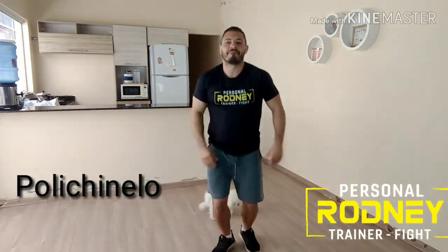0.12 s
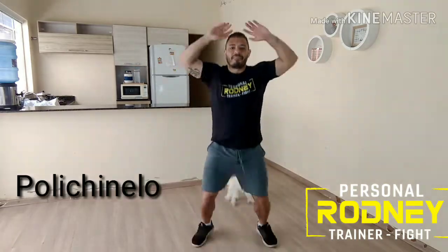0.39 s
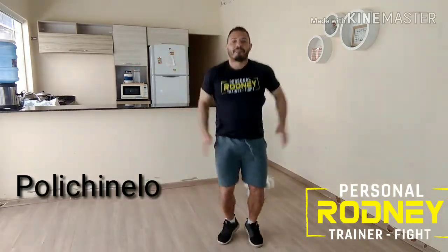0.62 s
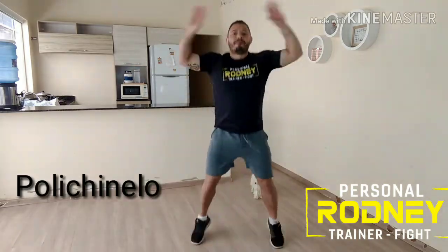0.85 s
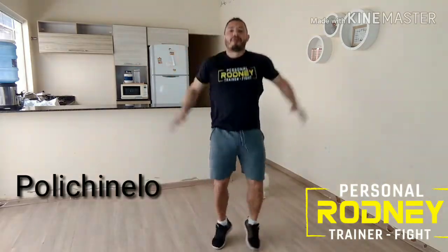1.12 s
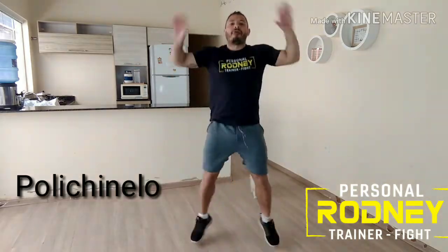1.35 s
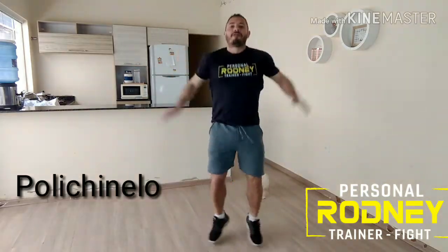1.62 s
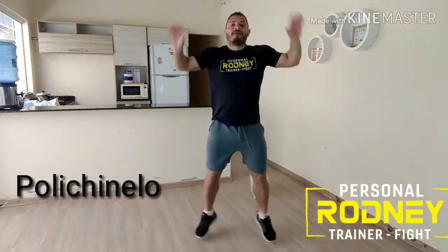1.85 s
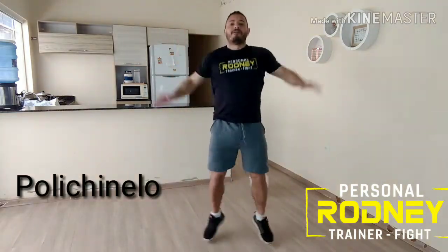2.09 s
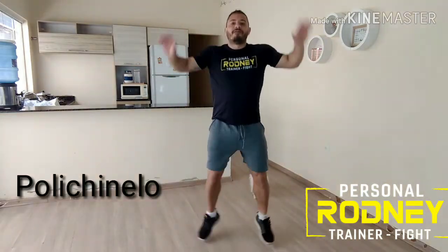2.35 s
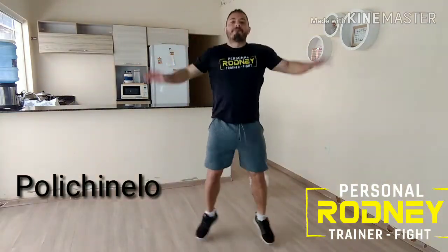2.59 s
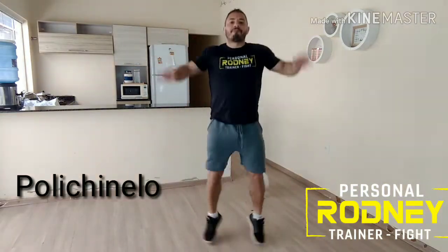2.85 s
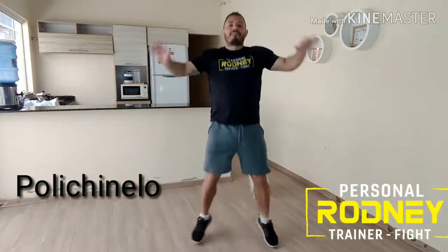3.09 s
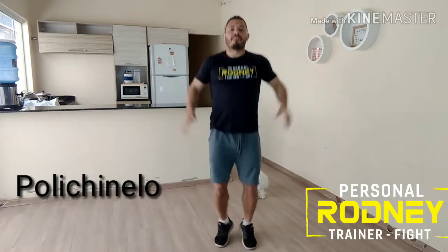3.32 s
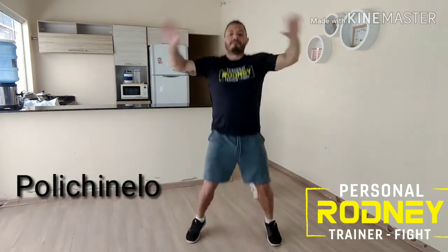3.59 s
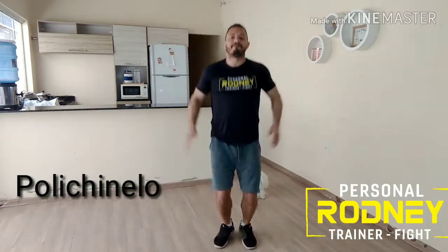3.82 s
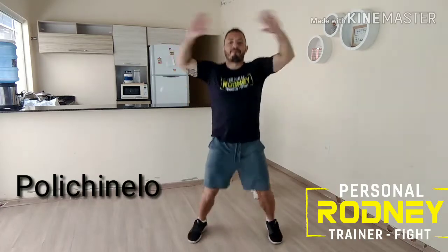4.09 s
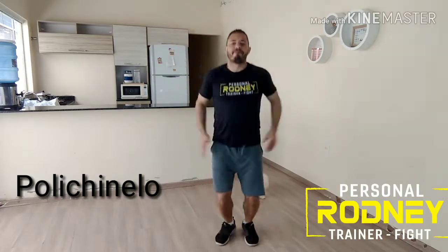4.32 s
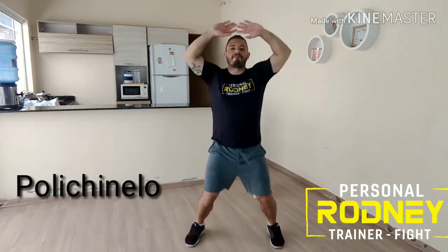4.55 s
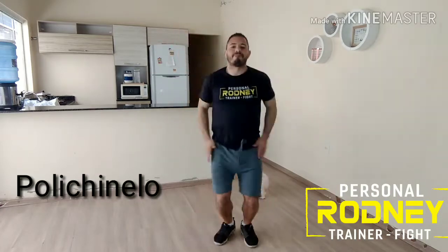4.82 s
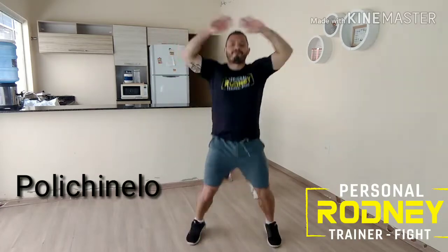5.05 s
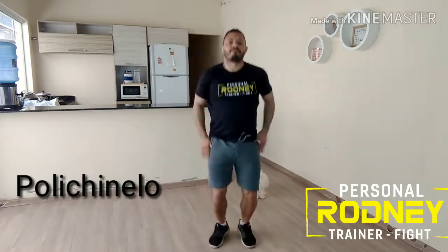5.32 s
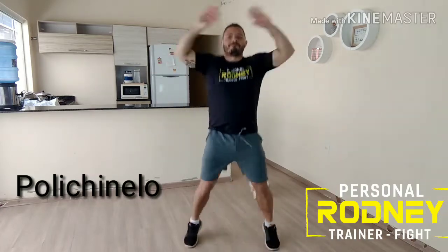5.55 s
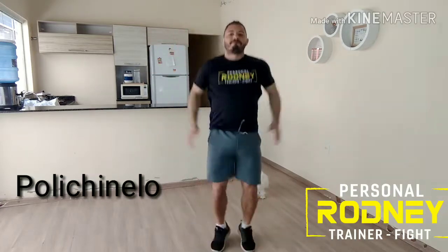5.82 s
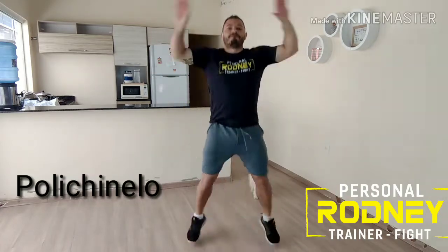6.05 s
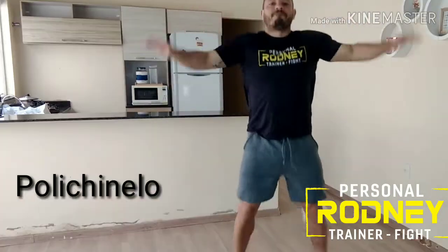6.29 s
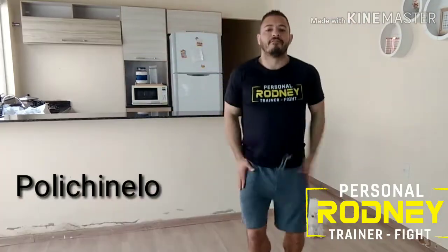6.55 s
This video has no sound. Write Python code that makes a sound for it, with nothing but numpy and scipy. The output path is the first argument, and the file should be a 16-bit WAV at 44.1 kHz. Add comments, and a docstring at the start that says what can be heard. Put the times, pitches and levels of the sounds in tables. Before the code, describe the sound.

Someone in sneakers does jumping jacks on a laminate floor in a bare, echoing room. The hollow thumps come about four a second, pitched up and shortened as if sped up, with soft pats and dry sole ticks between. Cloth hisses faintly over quiet room tone and a thin whine. At the end the speed drops to normal and several landings bunch into a loud, deeper clatter. Nearly mono, microphone a few metres away.

```python
"""Bare, lively room with a laminate floor: someone in sneakers does jumping jacks; an appliance whines faintly.
Landings are swelling, dying noise bands plus ringing floor modes; dry ticks, rubs and dull pats are
shorter noise bursts. Room tone and cloth hiss are shaped steady noise, the whine a sine. The middle stretch
is played back faster than life, so it sounds higher and shorter; Hz and t60 hold for that stretch."""
import sys
import numpy as np
from scipy import signal
from scipy.fft import rfft, irfft, next_fast_len
from scipy.io import wavfile
from scipy.ndimage import map_coordinates

SR = 44100
rng = np.random.default_rng(int(sys.argv[2]) if len(sys.argv) > 2 else 0)


def dump(signal):
    """Clip the signal to [-1, 1] and save it as 16-bit WAV at the path in sys.argv[1]."""
    limited = np.clip(np.atleast_2d(signal).T, -1, 1)
    pcm = np.round(limited * 32767).astype(np.int16)
    wavfile.write(sys.argv[1], SR, pcm)


def field_ratio(decibels):
    """Amplitude ratio for a level in dB (20 dB per decade); scalars and array-likes work."""
    return 10 ** (np.asarray(decibels, dtype=float) / 20)


N = 294102

SPEED, FAST_FROM_S, FAST_TO_S = 1.803, .101, 6.164
RATE = SR * SPEED   # scene samples per second of fast playback
BANDS_HZ = 45 * 2 ** np.arange(0, 9.3, .4)


def position(s):
    """Scene sample played at time s; the fast stretch advances SPEED times as quickly."""
    s = np.asarray(s, float)
    return SR * (s + (SPEED - 1) * np.clip(s - FAST_FROM_S, 0, FAST_TO_S - FAST_FROM_S))


LENGTH = next_fast_len(int(position(N / SR) + .45 * RATE))   # room for the last tail


def at_hz(points, hz, order=1):
    """Interpolates a table column over log frequency."""
    points = np.array(points)
    return np.interp(np.log(hz + 1), np.log(points[:, 0]), points[:, order])


def noise(spectrum):
    """Gaussian noise filtered to this spectrum, nominal rms 1."""
    shape = field_ratio(at_hz(spectrum, np.fft.rfftfreq(LENGTH, 1 / RATE)))
    shape = shape / np.sqrt(np.mean(shape ** 2))
    return irfft(rfft(rng.standard_normal(LENGTH)) * shape, LENGTH)


def band_pool(size):
    """Unrelated noise in overlapping bands, each of the same power per Hz."""
    octaves = np.log2(np.fft.rfftfreq(size, 1 / RATE) + 1)
    apart = np.clip((octaves - np.log2(BANDS_HZ)[:, None]) / .4, -1, 1)
    white = rng.standard_normal((len(BANDS_HZ), size))
    return irfft(rfft(white) * np.cos(apart * np.pi / 2), size)


# room decay: (frequency [Hz], t60 [s])
ROOM_DECAY = [(200, 0.33), (530, 0.4), (1400, 0.34), (3700, 0.39), (9700, 0.27), (20000, 0.55)]


def reverberant(times_s, level_db, band_db, rise_ms, direct_db, direct_ms):
    """Each blow swells, then dies in the room, band by band, with near sound on top."""
    size = int(.42 * RATE)
    pool, out = band_pool(2 ** 16), np.zeros(LENGTH + size)
    t = np.arange(size) / RATE
    decay = field_ratio(-60 * t / at_hz(ROOM_DECAY, BANDS_HZ)[:, None])
    envelope = decay * (1 - np.exp(-1000 * t / rise_ms)) ** 2
    starts = (rng.random(len(times_s)) * (pool.shape[1] - size)).astype(int)
    for at, level, db, ms, start in zip(position(times_s).astype(int), level_db, band_db, direct_ms, starts):
        gains = field_ratio(level + db) / np.sqrt(np.sum(field_ratio(2 * db) * BANDS_HZ) / RATE)
        direct = 1 + field_ratio(direct_db) * np.exp(-1000 * t / ms)
        out[at:at + size] += direct * (gains @ (pool[:, start:start + size] * envelope))
    return out[:LENGTH]


# room tone and cloth hiss over time: (time [s], room tone level [dB], swish level [dB])
STIR = [(0.0, -47, -45), (0.15, -52.5, -53), (0.72, -54, -62.5), (2.15, -54.5, -64.5), (2.75, -53.5, -59.5),
        (3.3, -54.5, -64.5), (3.881, -53.5, -59.5), (4.4, -55, -65), (4.87, -54, -59.5), (5.6, -54.5, -63),
        (5.92, -53.5, -62.5), (6.16, -55.5, -60), (6.3, -50, -53), (6.67, -38.5, -54)]
# room tone spectrum: (frequency [Hz], density [dB per Hz])
AIR = [(24, -61), (40, -12), (338, -2), (466, -4), (541, -8.5), (659, -4), (910, -7.5), (1230, -12.5),
       (3470, -21), (4030, -28), (5430, -24), (15000, -42)]
# cloth hiss spectrum: (frequency [Hz], density [dB per Hz])
SWISH = [(2500, -18), (5000, 1.5), (9000, 2.5), (15000, 2.5), (25000, 0)]
# cloth hisses as the limbs swing out of each landing
SWING_AFTER_S, SWING_WIDTH_S, SWING_DB = .16, 0.025, 1


def background():
    """Steady room tone, and the hiss of moving cloth in uneven random brushes."""
    n = np.arange(LENGTH)
    s, tone_db, swish_db = np.transpose(STIR)
    tone_db = np.interp(n, position(s), tone_db)
    swish_db = np.interp(n, position(s), swish_db)
    brush = np.interp(n * 52.0 / RATE, np.arange(999), rng.standard_normal(999))   # 52 knots/s
    knots = np.arange(0, LENGTH, 100)
    since_s = (knots - position(np.array(LANDINGS)[:, :1])) / RATE
    swing_db = SWING_DB * np.exp(-((since_s - SWING_AFTER_S) / SWING_WIDTH_S) ** 2).max(axis=0)
    swish_db = swish_db + np.interp(n, knots, swing_db) + 1.6 * brush
    return field_ratio(tone_db) * noise(AIR) + field_ratio(swish_db) * noise(SWISH)


WHINE_HZ, WHINE_RMS_DB = 1378.0, -63   # level ahead of the microphone


def whine():
    """Appliance: a thin steady sine."""
    return np.sqrt(2) * field_ratio(WHINE_RMS_DB) * np.sin(2 * np.pi * WHINE_HZ * np.arange(LENGTH) / RATE)


# soft pats, likely hands on thighs after feet-together landings, and flat-soled scuffs:
# (time [s], relative level [dB])
PATS = [(0.6603, -44), (1.2062, -37.5), (1.7132, -36), (2.2194, -39.5), (2.7472, -39), (3.78, -37),
        (4.309, -42.5), (4.417, -44.5), (4.8294, -51), (4.914, -46), (5.36, -51), (5.468, -39), (5.89, -50),
        (6.548, -19), (6.568, -16.5), (6.592, -25), (6.623, -32)]
# pat spectrum: (frequency [Hz], density [dB per Hz])
PAT_SPECTRUM = [(300, -22), (700, 6), (1500, -3.5), (2500, -6), (3500, -13.5), (6000, -17), (15000, -25)]


def pats():
    """Palm on cloth: a slow, dull slap without the floor's ring."""
    s, level_db = np.transpose(PATS)
    return reverberant(s - .0018, level_db - 7.5, [at_hz(PAT_SPECTRUM, BANDS_HZ)] * len(s),
                       rise_ms=1.7, direct_db=-10.0, direct_ms=np.full(len(s), 11.0))


# dry ticks as the soles leave the floor after feet-apart landings: (time [s], relative level [dB])
PUSH_OFFS = [(0.513, -32.5), (1.0364, -35), (1.3008, -45), (1.558, -34), (2.069, -35), (2.5743, -37.5),
             (3.0962, -36.5), (3.617, -35), (4.142, -36.5), (4.664, -36.5), (5.1908, -35.5), (5.719, -32),
             (6.2248, -28.5)]
PUSH_OFF_HZ, PUSH_OFF_BRIGHT_DB, PUSH_OFF_MS = 5840, -8, 1.5
# bright scrapes and rubs of sole or cloth:
# (time [s], relative level [dB], centre [Hz], length [ms])
RUBS = [(0.0809, -20.5, 9500, 4.4), (0.095, -23, 14520, 3.3), (.53, -42, 11000, 8), (2.745, -43, 5400, 62),
        (3.801, -47, 5500, 20), (5.639, -33, 12000, 1.5), (5.645, -32, 6800, 1.8),
        (6.5668, -23, 14600, 5.1)]
RUB_BRIGHT_DB = 3
# the sole ticks just after a landing, much louder for hard ones
SOLE_TICK_AFTER_S, SOLE_TICK_HZ, SOLE_TICK_BRIGHT_DB, SOLE_TICK_MS = .004, 5700, -5, 1.86
SOLE_TICK_DB, SOLE_TICK_DB_PER_DB, SOLE_TICK_TOP_DB, HARD_LANDING_DB = -33.5, 2.07, -18, -15.5


def tick_rows():
    """Time s, relative level dB, centre Hz, brightness dB and length ms of every tick and rub."""
    rows = []
    for s, db, first_db, *_ in LANDINGS:
        excess_db = db + max(first_db, 0) - HARD_LANDING_DB
        level_db = min(SOLE_TICK_TOP_DB, SOLE_TICK_DB + SOLE_TICK_DB_PER_DB * excess_db)
        rows.append((s + SOLE_TICK_AFTER_S, level_db, SOLE_TICK_HZ, SOLE_TICK_BRIGHT_DB, SOLE_TICK_MS))
    rows += [(s, db, PUSH_OFF_HZ, PUSH_OFF_BRIGHT_DB, PUSH_OFF_MS) for s, db in PUSH_OFFS]
    rows += [(s, db, hz, RUB_BRIGHT_DB, ms) for s, db, hz, ms in RUBS]
    return rows


# base tick spectrum: (frequency [Hz], density [dB per Hz])
TICK_SPECTRUM = [(1500, -31), (3500, -1), (6000, -13), (8000, -4.5), (11000, -5.5), (16000, -3.5),
                 (25000, -15)]


def ticks():
    """Short noise clicks around one pitch, with a weak room tail."""
    s, level_db, centre_hz, bright_db, length_ms = np.transpose(tick_rows())
    bump_db = 10.4 * np.exp(-(np.log2(BANDS_HZ / centre_hz[:, None]) / 0.44) ** 2)
    tilt_db = np.array([at_hz([(7000, 0), (11000, db)], BANDS_HZ) for db in bright_db])
    return reverberant(s - .0006, level_db - 21.0, at_hz(TICK_SPECTRUM, BANDS_HZ) + bump_db + tilt_db,
                       rise_ms=0.24, direct_db=12.0, direct_ms=length_ms)


# landings: (first foot time [s], relative level [dB], first foot against second [dB],
# gap between feet [ms], thud [dB])
LANDINGS = [(0.078, -23.5, -1, 10.93, 11), (0.355, -19, 4, 12.1, -6.5), (0.5998, -21, -3.5, 4.1, -9),
            (0.877, -18.5, 0.5, 4.84, -9.5), (1.131, -23.5, 1, 4.3, -10), (1.4145, -21, 4, 9.8, -2.5),
            (1.6595, -25, 2, 7.5, -7), (1.9175, -14, -2, 8.6, -2.5), (2.1636, -23, 2, 9, -9.5),
            (2.435, -20, 5, 9, -4), (2.6847, -21, -5, 4.26, -5.5), (2.9573, -14, -2, 6.16, -1.5),
            (3.2022, -23.5, 0, 8.8, -4.5), (3.4716, -16.5, -1.5, 4.5, 1.5), (3.7245, -23, -1.5, 9.3, -1),
            (4.005, -18.5, 4, 6.14, -5.5), (4.2553, -24, 1.5, 9.1, -6.5), (4.527, -15, -1, 14.6, -2),
            (4.769, -27.5, 4, 11.2, -7), (5.0515, -17, 2.5, 16.8, -1.5), (5.3008, -19, -1, 4.9, -15),
            (5.5791, -13.5, -4, 6.7, -0.5), (5.8304, -21, -5, 4.17, -1), (6.1086, -13, 1, 3.88, 0),
            (6.4294, -13, -2.5, 10.9, -7.5), (6.5465, -9.5, -3, 3.02, 2), (6.566, -12.5, -6, 9, -3),
            (6.591, -21.5, 4.5, 10.3, -1), (6.622, -25.5, -4, 12, 7)]


def feet():
    """Time s and relative level dB of every single foot: all first feet, then all second."""
    s, level_db, first_db, gap_ms = np.transpose(LANDINGS)[:4]
    return np.r_[s, s + gap_ms / 1000], np.r_[level_db + first_db, level_db]


# floor modes: (frequency [Hz], relative level [dB], t60 [s], capped at 0.35 when played)
BOARDS = [(445, -12, 0.47), (506, -11, 0.9), (538, -20, 0.24), (640, -39, 0.19), (673, -13, 0.31),
          (731, 6.5, 0.19), (772, 0.5, 0.26), (789.4, 9.5, 0.093), (860, 4, 0.16), (923, 3, 0.29),
          (971, 3, 0.22), (1006, -3, 0.25), (1177, -17.5, 0.4), (1260, -41, 0.29), (538, 1.5, 0.019),
          (960, 2.5, 0.028)]


def boards():
    """Each foot strikes decaying floor resonators; most start in step, which makes the first knock."""
    s, foot_db = feet()
    out, thud_db = np.zeros(LENGTH), np.tile(np.array(LANDINGS)[:, 4], 2)
    for hz, mode_db, t60_s in BOARDS:
        mode_db = mode_db + thud_db * at_hz([(350, 1), (950, 0)], hz)   # thud sets the low modes
        chance = rng.standard_normal((len(s), 2))
        sign = np.sign(chance[:, 0] + .7)
        clicks = np.full(LENGTH, 1e-18)
        clicks[position(s - .0003).astype(int)] = sign * field_ratio(foot_db + mode_db - 24.0 + 5.65 * chance[:, 1])
        r, w = field_ratio(-60 / (min(t60_s, .35) * RATE)), 2 * np.pi * hz / RATE
        out += signal.lfilter([0, np.sin(w)], [1, -2 * r * np.cos(w), r * r], clicks)
    return signal.sosfilt(signal.butter(2, 330, "high", fs=RATE, output="sos"), out)


# base landing spectrum: (frequency [Hz], density [dB per Hz])
THUMP = [(35, -80), (60, -62), (170, -30.5), (503, -2), (835, -2), (1710, -23.5), (2780, -25.5),
         (3930, -42.5), (5950, -32), (8040, -48.5), (9670, -31), (15000, -49)]
# swell of a landing: (frequency [Hz], rise time constant [ms])
RISE = [(300, 0.85), (900, 1.33), (2500, 2.2), (8000, 3.7)]
SLAP_DB, SLAP_DB_PER_THUD_DB = -0.5, 0.39   # sole slap fades as the thud gets lighter


def landings():
    """Sole on laminate: a thump coloured by how heavy and how flat the feet come down."""
    s, foot_db = feet()
    colour_db = []
    for *_, thud_db in LANDINGS:
        slap_db = SLAP_DB + SLAP_DB_PER_THUD_DB * min(thud_db, 0)
        colour_db.append(at_hz([(350, thud_db), (950, 0), (1200, 0), (2200, slap_db)], BANDS_HZ))
    both_feet_db = np.array(2 * colour_db)
    return reverberant(s - .0005, foot_db - 11.5, at_hz(THUMP, BANDS_HZ) + both_feet_db,
                       at_hz(RISE, BANDS_HZ)[:, None], direct_db=-2.0, direct_ms=np.full(len(s), 12.0))


FAST_TOP_HZ, SLOW_TOP_HZ = 15550, 14200   # top edges as heard


def played(spectrum):
    """Reads the scene out at two speeds, each with its own top edge."""
    hz, s = np.fft.rfftfreq(LENGTH, 1 / RATE), np.arange(N) / SR
    fast = irfft(spectrum * (hz < FAST_TOP_HZ), LENGTH)
    slow = irfft(spectrum * (hz < SLOW_TOP_HZ * SPEED), LENGTH)
    fast, slow = [map_coordinates(x, [position(s)], order=3) for x in (fast, slow)]
    return np.where((s > FAST_FROM_S) & (s < FAST_TO_S), fast, slow)


NOTCH_HZ, REFLECTION_GAIN, REFLECTION_CUT_HZ = 4066, 0.53, 29000
MIC_LOW_HZ, MIC_HIGH_HZ = 65, 19000


def microphone(hz):
    """A dull near reflection combs the sound; the capsule drops both ends."""
    echo = REFLECTION_GAIN * np.exp(-2j * np.pi * hz / NOTCH_HZ - (hz / REFLECTION_CUT_HZ) ** 2)
    low_cut = (1 + MIC_LOW_HZ / (1j * hz + 1e-9)) ** 2
    return (1 - echo) / low_cut / (1 + (hz / MIC_HIGH_HZ) ** 4)


# two microphone ports: (frequency [Hz], side minus mid [dB],
# share of side power that follows the mid [0-1], its phase lead [rad])
PORTS = [(60, -1, .4, 2.5), (170, -6.5, .8, 1.8), (430, -15, 0.71, 1.4), (1020, -21.5, 1, 1),
         (1410, -31.5, .3, 0), (2100, -44, .1, 8), (6040, -35, .1, 0.5), (8000, -1.5, .4, 1.2),
         (8600, -9.5, 0.56, -2), (11200, -7, 0.54, -5.5), (14700, -7, 0.51, -11), (19000, -11, .4, -15.5),
         (23000, -16, .3, -21)]


def scene():
    """Nearly mono mix: the side is part phase-shifted mid, part unrelated room sound."""
    hz = np.fft.rfftfreq(LENGTH, 1 / RATE)
    mic = microphone(hz)
    mid = mic * rfft(landings() + boards() + pats() + ticks() + background() + whine())
    unrelated = mic * rfft(landings() + pats() + ticks() + background())
    side_db, share, lead_rad = [at_hz(PORTS, hz, order=column) for column in (1, 2, 3)]
    side = np.sqrt(share) * np.exp(1j * lead_rad) * mid + np.sqrt(1 - share) * unrelated
    mid, side = played(mid), played(field_ratio(side_db) * side)
    return np.array([mid + side, mid - side])


def top_cut(x):
    """Nothing passes above the cut-off."""
    return signal.sosfilt(signal.butter(12, 16030, fs=SR, output="sos"), x)


def record(dry):
    """Delivers the finished mix."""
    return top_cut(dry)


dry = scene()
out = record(dry)
dump(out)
```